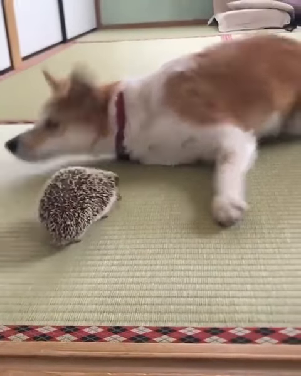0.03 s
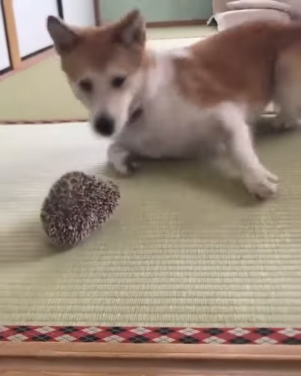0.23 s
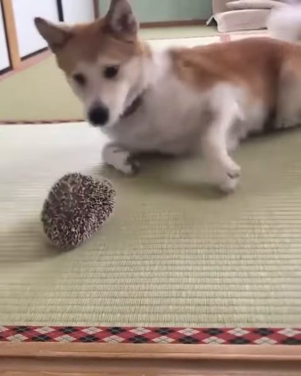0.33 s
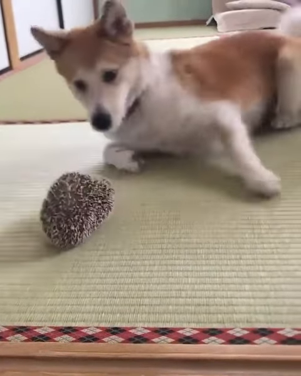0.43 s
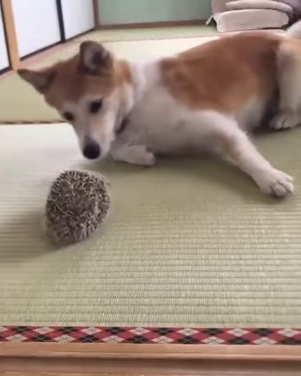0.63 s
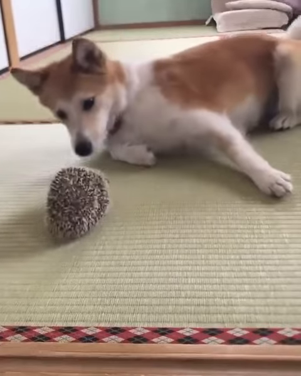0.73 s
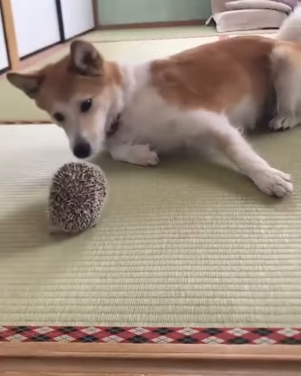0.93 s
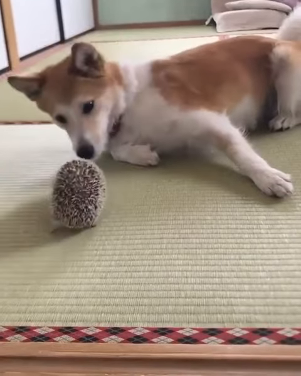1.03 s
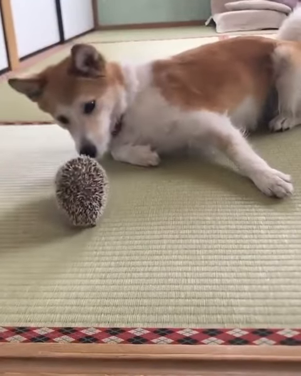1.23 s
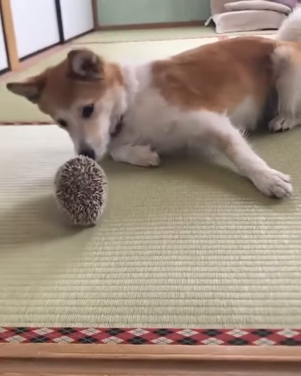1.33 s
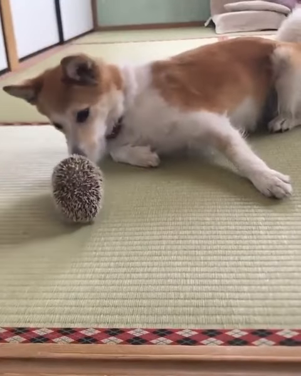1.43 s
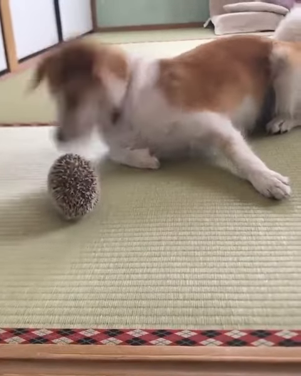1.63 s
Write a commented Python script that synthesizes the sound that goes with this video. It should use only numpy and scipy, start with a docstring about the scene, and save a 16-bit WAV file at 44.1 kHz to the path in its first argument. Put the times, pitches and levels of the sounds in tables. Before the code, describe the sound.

A dog's paws scramble briefly on a straw mat, followed by faint rustles.

```python
"""In the hush of a small room, a dog lying on a straw mat stirs, then starts back from a hedgehog.
From 0.2 to 0.7 s its paws scrape over the ribbed weave: stick-slip friction rings the mat, the claws
catch sharply, and its weight thumps the floor. Its coat then slides to rest with a soft hiss.
From 0.9 s come a few small ticks and faint rustles as it noses closer."""
import sys
import numpy as np
from scipy import signal
from scipy.fft import rfft, irfft
from scipy.io import wavfile

SR = 44100
rng = np.random.default_rng(int(sys.argv[2]) if len(sys.argv) > 2 else 0)


def dump(signal):
    """Clip the signal to [-1, 1] and save it as 16-bit WAV at the path in sys.argv[1]."""
    limited = np.clip(np.atleast_2d(signal).T, -1, 1)
    pcm = np.round(limited * 32767).astype(np.int16)
    wavfile.write(sys.argv[1], SR, pcm)


N = 74970
T = np.arange(N) / SR


def amp(db):
    """Decibels to amplitude ratio."""
    return 10 ** (np.asarray(db) / 20)


def unit_rms(x):
    """Normalisation to rms 1."""
    return x / np.sqrt(np.mean(x ** 2))


def resonate(x, hz, width_hz):
    """Two-pole resonance, gain 1 at its centre."""
    g, damping = np.tan(np.pi * min(hz / SR, .45)), width_hz / hz
    loss = g * damping
    return signal.lfilter([loss, 0, -loss], [1 + loss + g * g, 2 * g * g - 2, 1 - loss + g * g], x)


def colour(x, spectrum, size=8192):
    """Minimum-phase filtering through (f/Hz, level/dB) points; result at rms 1."""
    hz, db = np.array(spectrum).T
    f = np.maximum(np.arange(size // 2 + 1) * SR / size, 1)
    cepstrum = irfft(np.log(amp(np.interp(np.log(f), np.log(hz), db))))
    cepstrum[1:size // 2] *= 2
    cepstrum[size // 2 + 1:] = 0
    response = irfft(np.exp(rfft(cepstrum)))
    return unit_rms(irfft(rfft(x) * rfft(response, N), N))


def grains(per_s, spread_db):
    """Shot noise: tiny snaps of random time, sign and size."""
    impulses = (rng.random(N) < per_s / SR) * rng.choice([-1, 1], N)
    return impulses * amp(spread_db * np.clip(rng.standard_normal(N), -2, 2))


def stroke(start, rise, hold, fall):
    """Friction envelope: a limb speeds up, slides and slows, losing 27 dB per fall time."""
    attack = np.clip((T - start) / rise, 0, 1) ** 0.98
    return attack * amp(-27 * np.maximum(T - start - rise - hold, 0) / fall)


# Spectrum of the quiet room: f/Hz, level/dB
HUSH_SPECTRUM = [(20, -15.5), (40, -12), (70, 1.5), (110, -6.5), (170, -11), (270, -11), (450, -18.5),
                 (800, -19.5), (1300, -21.5), (2200, -25), (5000, -28), (10000, -31.5), (14000, -31)]
def room_hush():
    """Stationary noise, strongest in the bass."""
    return amp(-70) * colour(rng.standard_normal(N), HUSH_SPECTRUM)


def reverberate(x, t60_s=0.33, gap_s=0.0058):
    """Reverberation: soft reflections from paper screens and walls decay exponentially."""
    tail = rng.standard_normal(N) * (T > gap_s) * amp(-60 * T / t60_s)
    tail = tail / np.sqrt(np.sum(tail ** 2))
    tail = signal.lfilter(*signal.butter(1, 6040, fs=SR), tail)
    return x + amp(-9.5) * signal.fftconvolve(x, tail)[:N]


# Spectrum of the body's rumble: f/Hz, level/dB
RUMBLE_SPECTRUM = [(20, -36.5), (42, 0), (62, 2.5), (80, 0), (120, -3), (190, -4.5), (280, -7.5),
                   (420, -15.5), (600, -24), (1200, -28.5), (4000, -70.5)]
# Envelope of that rumble: t/s, level/dB
RUMBLE_ENVELOPE = [(0, -75), (.17, -68), (.21, -50), (.27, -48), (.35, -50.5), (.42, -56), (.5, -56.5),
                   (.58, -60), (.7, -67.5), (.8, -69), (1.1, -70.5), (1.7, -72.5)]
# Weight landing on the mat: t/s, peak level/dB, f/Hz, rise/s, decay/s
LANDINGS = [(0.266, -46.5, 260, 0.0036, 0.018), (0.282, -42, 116.5, 0.0086, 0.056),
            (.325, -42.5, 118.4, 0.016, 0.033), (.328, -43, 353, 0.0013, 0.0036),
            (0.449, -48, 348, 0.0034, 0.0073), (0.453, -42.5, 64.4, 0.013, 0.021),
            (0.476, -39.5, 91, 0.0095, 0.015), (0.522, -47.5, 45.7, 0.0057, 0.071),
            (0.941, -57.5, 189, 0.0039, 0.021), (1.048, -59, 108, 0.0012, 0.0072)]
def floor_thumps():
    """Damped vibration: padded blows ring the floor briefly, over the rumble of the shifting body."""
    out = colour(rng.standard_normal(N), RUMBLE_SPECTRUM) * amp(np.interp(T, *np.array(RUMBLE_ENVELOPE).T))
    for start, db, hz, rise, decay in LANDINGS:
        age = np.maximum(T - start, 0)
        envelope = np.minimum(age / rise, 1) * np.exp(-np.maximum(age - rise, 0) / decay)
        out += amp(db) * envelope * np.sin(2 * np.pi * hz * age)
    return out


# Spectra of the fur's hiss and the duller rub: f/Hz, level/dB
FUR_SPECTRUM = [(500, -6.5), (1400, -7.5), (2200, -2.5), (4700, 4.5), (7500, 3), (10300, -1.5), (14000, 2)]
RUB_SPECTRUM = [(300, -4.5), (600, -16.5), (900, -8), (1400, 1), (1900, -9.5), (3000, -5.5), (8000, -31)]
# Light strokes: t/s, rise/s, hold/s, fall/s, fur level/dB, rub level/dB
FUR_STROKES = [(-.02, 0.021, 0.012, 0.03, -74, -78), (0.082, 0.041, 0.0075, 0.021, -62, -63),
               (0.683, 0.051, 0.11, 0.082, -66, -77.5), (0.747, 0.021, 0.013, 0.044, -66, -74),
               (0.829, 0.032, 0.023, 0.14, -70, -81.5), (0.942, 0.031, 0.007, 0.012, -67, -68.5),
               (1.026, 0.022, 0.0071, 0.014, -69.5, -82), (1.116, 0.0089, 0.021, 0.1, -70, -76.5),
               (1.186, 0.025, 0.023, 0.017, -75.5, -73), (1.261, 0.014, 0.007, 0.038, -67.5, -75),
               (1.336, 0.022, 0.01, 0.018, -67.5, -77), (1.411, .01, 0.0083, 0.019, -69.5, -69),
               (1.438, 0.015, 0.0096, 0.021, -69.5, -74), (1.534, 0.024, 0.0062, 0.015, -70.5, -83),
               (1.591, 0.025, 0.0094, 0.028, -67.5, -68), (1.635, 0.011, 0.0085, 0.032, -66, -72.5)]
def fur_brushes():
    """Sliding friction: fur and feet on straw give a fine hiss over a duller rub."""
    fur = colour(grains(per_s=7000, spread_db=6), FUR_SPECTRUM)
    rub = colour(grains(per_s=2000, spread_db=8), RUB_SPECTRUM)
    return sum(stroke(*timing) * (amp(fur_db) * fur + amp(rub_db) * rub)
               for *timing, fur_db, rub_db in FUR_STROKES)


# Claw catches and small ticks: t/s, peak level/dB, f/Hz, bandwidth/Hz, crunch decay/s
CONTACTS = [(0.2238, -37.5, 1700, 3400, 0.00088), (0.236, -34, 1430, 2000, 0.002),
            (0.2461, -27, 1500, 2500, 0.0013), (0.467, -32, 10400, 8900, 0.0018),
            (0.571, -33.5, 2580, 2970, 0.0025), (0.6566, -32, 1730, 3500, 0.0004),
            (0.6686, -31, 1500, 2620, 0.00085), (0.6837, -38.5, 2000, 3970, 0.00046),
            (0.974, -44.5, 7050, 4970, 0.0011), (0.9729, -58.5, 1470, 600, 0.0027),
            (0.975, -47.5, 9500, 7000, 0.00048), (1.123, -44, 3420, 1300, 0.00086),
            (1.1307, -44, 2950, 850, 0.0014), (1.2115, -65, 2000, 4000, 0.0006),
            (1.337, -51.5, 1330, 525, 0.0016), (1.419, -50.5, 1800, 4020, 0.0009),
            (1.6276, -57.5, 3000, 3980, 0.00056)]
def claw_ticks():
    """Impact excitation: a sharp contact and a crunch of straw drive a resonance under a bright edge."""
    out = np.zeros(N)
    bass_cut = signal.butter(2, 620, "high", fs=SR, output="sos")
    for start, db, hz, width, decay in CONTACTS:
        force = amp(-7.5) * rng.standard_normal(N) * (T >= start) * np.exp(-np.abs(T - start) / decay)
        force[int(start * SR)] += 1  # first contact, ahead of the crunch
        ring = resonate(resonate(force, hz, width), hz, 6.8 * width)
        edge = amp(-19.5) * resonate(force, hz=4700, width_hz=6400)
        snap = signal.sosfilt(bass_cut, ring + edge)
        out += amp(db) * snap / np.abs(snap).max()
    return out


# Modes of the mat under a paw: f/Hz, bandwidth/Hz, level/dB
MAT_MODES = [(901, 33, 5.5), (1064, 10.6, 7.5), (1262, 47, 1), (1373, 56, -4), (1590, 27, -5),
             (2338, 50, 6.5), (2680, 120, -6.5)]
# Spectra of the claws' rasp and the straw's hiss: f/Hz, level/dB
RASP_SPECTRUM = [(300, -40), (520, -28.5), (800, -12), (1100, 1.5), (1450, 1), (1800, -2.5), (2350, -3.5),
                 (3000, -4), (3900, -4.5), (5500, -11.5), (9000, -17.5), (14000, -49)]
STRAW_SPECTRUM = [(300, -8.5), (700, -1.5), (1500, -3), (3000, 2.5), (5000, 1), (8000, 2), (10300, -3),
                  (12000, 0.5), (14000, -2.5)]
# Scrapes: t/s, rise/s, hold/s, fall/s, rasp level/dB, rasp cutoff f/Hz, hiss level/dB,
# ring f/Hz, ring level/dB
PAW_STROKES = [(0.183, 0.041, 0.012, 0.04, -40, 6800, -48, 1095, -52.5),
               (0.234, 0.04, 0.027, 0.085, -47.5, 9000, -41.5, 690, -55),
               (0.319, 0.043, 0.015, 0.045, -40, 8000, -41, 1100, -55),
               (0.353, 0.013, 0.038, 0.03, -43.5, 9000, -46.5, 1110, -48.5),
               (0.419, 0.022, 0.026, 0.019, -55.5, 9000, -54.5, 1010, -74),
               (0.442, 0.028, 0.022, 0.057, -45.5, 9000, -47, 744, -50),
               (0.538, 0.048, 0.038, 0.11, -47.5, 7060, -45, 1011, -47),
               (0.597, 0.039, 0.018, 0.066, -44.5, 3600, -71, 910, -50.5)]
def paw_scrapes():
    """Stick-slip friction: claws catch on the ribs and ring the mat; straw hisses under the pads."""
    out = np.zeros(N)
    for *timing, rasp_db, cutoff_hz, hiss_db, ring_hz, ring_db in PAW_STROKES:
        catches = grains(per_s=5000, spread_db=2)
        detune = 1 + .03 * rng.uniform(-1, 1)  # the mat rings differently under each paw
        mat = catches + sum(amp(db) * resonate(catches, hz * detune, width) for hz, width, db in MAT_MODES)
        treble_cut = signal.butter(2, cutoff_hz, fs=SR)  # slow strokes are duller
        rasp = unit_rms(signal.lfilter(*treble_cut, colour(mat, RASP_SPECTRUM)))
        ring_width = 0.47 * ring_hz
        ring = unit_rms(resonate(resonate(mat, ring_hz, ring_width), ring_hz, ring_width))
        hiss = colour(grains(per_s=12000, spread_db=5), STRAW_SPECTRUM)
        out += stroke(*timing) * (amp(rasp_db) * rasp + amp(ring_db) * ring + amp(hiss_db) * hiss)
    return out


def scene():
    """Superposition: the hush, the reverberant sounds of the mat and the floor's thumps add."""
    hush = room_hush()
    mat = reverberate(paw_scrapes() + fur_brushes() + claw_ticks())
    return (hush + mat + floor_thumps())[None]


def record(dry):
    """Band limiting: a steep low-pass removes the treble above 13.9 kHz."""
    return signal.sosfilt(signal.ellip(10, .2, 70, 13900, fs=SR, output="sos"), dry)


dry = scene()
out = record(dry)
dump(out)
```